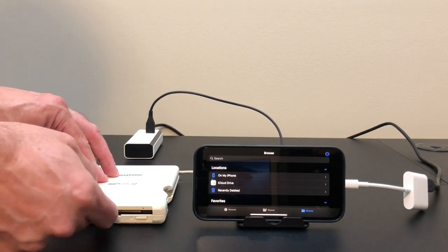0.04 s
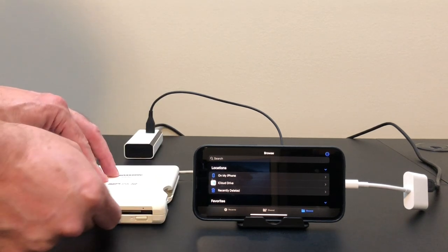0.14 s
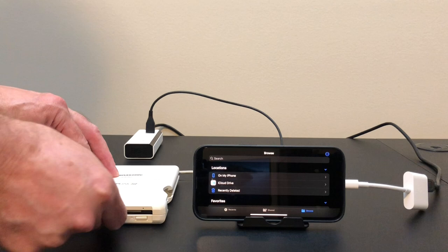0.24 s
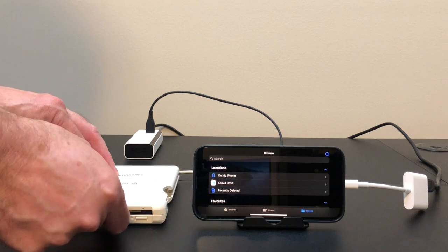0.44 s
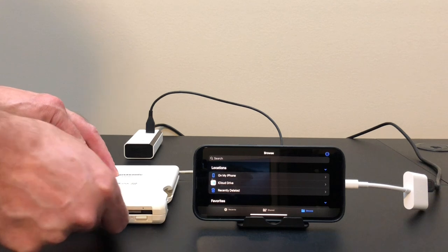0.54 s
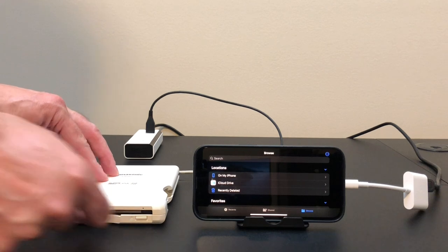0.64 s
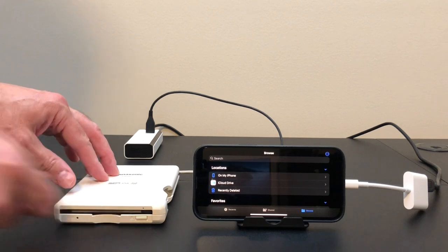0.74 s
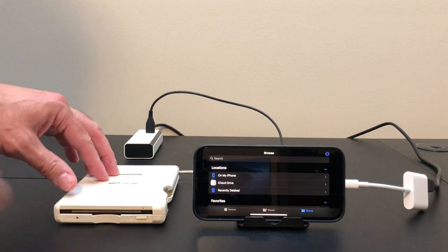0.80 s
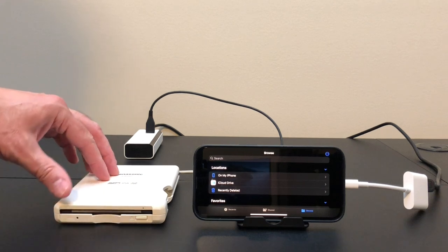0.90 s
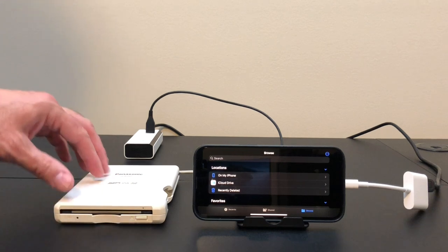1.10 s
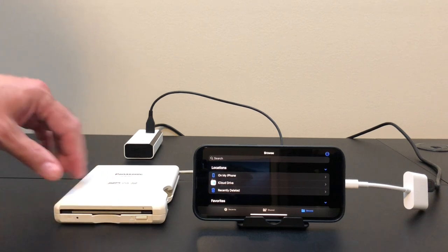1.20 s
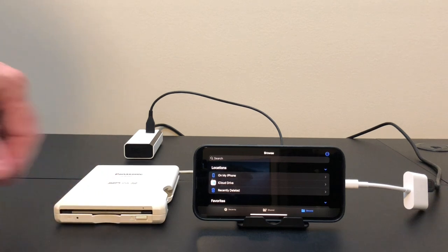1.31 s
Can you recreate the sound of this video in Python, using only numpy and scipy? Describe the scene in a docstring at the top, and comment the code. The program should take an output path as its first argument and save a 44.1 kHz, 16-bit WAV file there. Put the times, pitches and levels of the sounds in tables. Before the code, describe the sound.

A floppy disk clunks into its drive, followed by faint clicks and a short motor whir.

```python
"""A plastic clunk and a thump in the desk: a floppy disk is pushed home and the drive's carriage drops.
The disk rubs faintly in its sleeve while the mechanism ticks, plastic and metal in short contacts.
Then the head stepper whirs, its even steps stacking up harmonics; it clacks and runs on with a
sharper tone. All of it is close by, in a quiet room with a low hum."""
import sys
import numpy as np
from scipy import signal
from scipy.fft import rfft, irfft, next_fast_len
from scipy.io import wavfile
from scipy.ndimage import map_coordinates

SR = 44100
rng = np.random.default_rng(int(sys.argv[2]) if len(sys.argv) > 2 else 0)


def log_audio(samples):
    """Write samples as a 16-bit WAV file to the path given in sys.argv[1]."""
    # one column per channel
    frames = np.atleast_2d(samples).T
    # limit to full scale, then quantise
    limited = np.clip(frames, -1, 1)
    pcm = np.round(limited * 32767).astype(np.int16)
    wavfile.write(sys.argv[1], SR, pcm)


N = 59535
T = np.arange(N) / SR

# colour of the still room air: frequency_hz, level_db
AIR_COLOUR = [(20, -45), (35, -27.5), (55, -7), (75, -14), (100, -27.5), (160, -8.5), (220, -14.5),
              (320, -35), (500, -23.5), (800, -21), (1250, -32), (3000, -43), (8000, -46.5), (16000, -55)]
# how long the room rings: frequency_hz, t60_s
ROOM_DECAY = [(150, .28), (400, 0.51), (700, 0.33), (2000, 0.31), (6000, 0.34), (10000, 0.24),
              (16000, 0.22)]
# fader for the disk rubbing in its sleeve: time_s, level_db
RUB_FADER = [(.3, -80), (.4, -60.5), (.58, -65), (.66, -71.5), (.85, -78)]
# colour of that rustle: frequency_hz, level_db
RUB_COLOUR = [(30, -14), (70, 12), (120, -6.5), (300, -6), (520, -4), (680, -3.5), (850, 2), (980, -3),
              (1150, -20.5), (3000, -21.5), (7000, -22.5), (14000, -38)]
# thin sagging tone in the rustle: time_s, pitch_hz, level_db
RUB_GLIDE = [(0.341, 869.2, -66), (.42, 855, -65.5), (.52, 861, -65), (.61, 826, -66), (0.671, 817, -87)]
# mechanism ticks and head clack: start_s, level_db, metal_share_db, t60_s, pitch_hz, ring_share_db
TICK_HITS = [(.461, -62.5, -29, 0.043, 1224, 1), (.5225, -53.5, 8, 0.018, 4560, 2.5),
             (.6005, -49, -4.5, 0.024, 1440, -22), (.692, -56.5, -29, 0.012, 2080, 4.5),
             (.7065, -47.5, 0.5, 0.015, 7170, -5), (.7115, -46.5, -3.5, 0.012, 760, -4),
             (.755, -62.5, -24, 0.048, 2250, -21), (.8668, -49.5, -9.5, 0.031, 2430, -5.5),
             (.8892, -47, 0, 0.018, 6900, -7), (1.0265, -55, 3, 0.019, 2620, 2)]
CLACK_HITS = [(1.1625, -41.5, -15, 0.039, 1556, -0.5), (1.1692, -31, 4.5, 0.018, 5450, -17),
              (1.1725, -37, -21, 0.061, 2690, -10.5), (1.178, -39, -33, 0.045, 760, -4),
              (1.197, -48.5, -9, 0.052, 5180, 1)]
# colours of their plastic and metal parts: frequency_hz, level_db
TICK_PLASTIC_COLOUR = [(200, -10.5), (700, -2.5), (1400, -6), (2300, 2.5), (3200, -7.5), (4200, -16.5),
                       (8500, -15), (16000, -40)]
TICK_METAL_COLOUR = [(500, -5), (3000, -7), (4650, -3), (5800, -4), (6700, 2), (7600, -2), (8800, -14),
                     (11500, -12.5), (16000, -26)]
CLACK_PLASTIC_COLOUR = [(150, -3), (400, -2), (750, -3.5), (1100, -4.5), (1600, -1.5), (2100, -2),
                        (2800, -1.5), (3700, -1.5), (4400, -10.5), (16000, -63)]
CLACK_METAL_COLOUR = [(1000, -44), (4400, -17), (5400, 6), (6200, -5.5), (7300, -2.5), (9500, -18),
                      (11400, -14), (13000, -24), (16000, -27)]
# runs of the head stepper: start_s, end_s, step_rate_hz, tone_db, buzz_db
STEPPER_RUNS = [(0.892, 1.158, 200.7, -61, -65), (1.151, 1.4, 199.9, -54.5, -66)]
# balance of step harmonics 3 to 20, one row a run, one column a harmonic: level_db
HARMONIC_LEVELS = [
    [-10.5, -26, -12.5, 0, -17.5, -9.5, -10.5, -11, -16, -11, -1, -12.5, -10, -12, -10, -8, -13, -18],
    [-16.5, -14, -19, 0, -17.5, -19.5, -18, -16.5, -34, -8, -13.5, -21, -16.5, -13, -16.5, -7, -23, -19],
]
# fader for the whining harmonic as the head travels: time_s, gain_db
WHINE_FADER = [(.9, -5.5), (.99, 0.5), (1.03, -1), (1.06, -2), (1.15, 0), (1.25, -2)]
# colours of the stepper's treble buzz and its rattle: frequency_hz, level_db
BUZZ_COLOUR = [(3000, -29), (4000, 5), (4600, -3.5), (5300, 2.5), (6500, 0), (7200, -11), (8000, -1.5),
               (9000, -8), (12000, -18)]
RATTLE_COLOUR = [(200, 17.5), (400, -11), (700, 12.5), (1100, -6), (2400, 3.5), (3500, -5), (4500, -6),
                 (6000, -5), (8000, -3.5), (10000, -21), (16000, -24)]
# modes of the drive on the desk: pitch_hz, level_db, t60_s
DESK_MODES = [(50, -26, 0.78), (106.2, -14.5, 0.48), (138.7, 4.5, 0.15), (153.65, -8.5, 0.44),
              (214.2, 2, .21)]
# jolts that thump the desk: start_s, level_db, rise_s
DESK_THUMPS = [(0.2426, -20, 0.0042), (1.186, -42.5, 0.0023)]
# gentle rocking that swells the desk's main resonance: peak_s, level_db, half_length_s
DESK_SWAYS = [(0.389, -41, 0.011), (0.504, -43.5, 0.025), (0.611, -61, 0.032), (0.947, -46, 0.017),
              (1.005, -48.5, 0.023), (1.046, -45, 0.0057), (1.15, -50.5, .018), (1.199, -39, 0.023)]
# blows of the dropping carriage: start_s, level_db
CARRIAGE_HITS = [(0.2361, -25), (0.2385, -19.5), (0.2436, -27.5), (0.2558, -43), (.268, -34.5)]
# colour of each blow: frequency_hz, level_db
CARRIAGE_COLOUR = [(80, -42), (180, -38), (280, -6.5), (350, 1.5), (470, -6), (720, -1.5), (860, -9.5),
                   (1250, -8), (1550, -6), (2000, -5), (2400, -5.5), (3200, -11), (4500, -18),
                   (5600, -16.5), (6600, -17.5), (8000, -16.5), (9500, -22.5), (11000, -22.5),
                   (16000, -40.5)]
# modes of the plastic case: pitch_hz, level_db, t60_s
CASE_MODES = [(484.8, -4.5, .25), (564, -3.5, 0.16), (664, -6, 0.29), (711, -8.5, 0.28), (750, -1.5, 0.17),
              (777, -7.5, 0.23), (934, -3, .14), (1143, -7.5, 0.21), (1271, 0.5, 0.061), (1810, -4, 0.067),
              (1972, -5, 0.16), (1989, 9, 0.034), (2140, -11.5, 0.19), (6070, -13.5, 0.14)]


def amp(db):
    """Decibels to gain."""
    return 10 ** (np.asarray(db) / 20)


def unit(x):
    """Scale to rms 1."""
    return x / np.sqrt(np.mean(x ** 2) + 1e-20)


def along(points, hz):
    """Read a curve of (frequency_hz, value) points on a log frequency axis."""
    frequencies, values = np.transpose(points)
    return np.interp(np.log(hz + 1), np.log(frequencies + 1), values)


def noise(colour):
    """Coloured noise of rms 1."""
    eq = amp(along(colour, np.fft.rfftfreq(N, 1 / SR)))
    return unit(irfft(rfft(rng.standard_normal(N)) * eq, N))


def wobble(rate_hz):
    """A smooth random drift with rate_hz knots a second."""
    coarse = np.linspace(0, T[-1], 400)
    drift = map_coordinates(rng.standard_normal(64), [coarse * rate_hz], mode='mirror')
    return np.interp(T, coarse, drift)


def strike(start_s, rise_s, t60_s):
    """Envelope of a hit: quick attack, exponential decay."""
    age = np.maximum(T - start_s, 0)
    return (1 - np.exp(-age / rise_s)) * np.exp(-np.log(1000) * age / t60_s)


def ring(modes, start_s, rise_s):
    """A struck body rings as a sum of damped sines."""
    return sum(amp(db) * strike(start_s, rise_s, t60_s) * np.sin(2 * np.pi * hz * (start_s - T))
               for hz, db, t60_s in modes)


def room_tone(air_db=-70, hum_hz=119, hum_db=-66):
    """The bed: still air and mains hum."""
    hum = np.sqrt(2) * np.sin(2 * np.pi * hum_hz * T)
    return amp(air_db) * noise(AIR_COLOUR) + amp(hum_db) * hum


def room_reverb(x, wet_db):
    """The sound plus the room's tail, each frequency dying at its own speed."""
    hz, t, spectrum = signal.stft(rng.standard_normal(SR // 2), SR, nperseg=256)
    decay = np.exp(-np.log(1000) * t / along(ROOM_DECAY, hz)[:, None])
    tail = signal.istft(spectrum * decay, SR, nperseg=256)[1]
    tail *= 1 - np.exp(-np.arange(len(tail)) / SR / 0.0023)  # soften the attack
    return x + amp(wet_db) * signal.fftconvolve(x, tail / np.linalg.norm(tail))[:N]


def sleeve_rub():
    """The disk rubs in its sleeve as it settles: a faint rustle with a thin, sagging tone."""
    times, hz, db = np.transpose(RUB_GLIDE)
    phase = 2 * np.pi * np.cumsum(np.interp(T, times, hz)) / SR + 0.5 * wobble(rate_hz=30)
    tone = amp(np.interp(T, times, db, left=-120, right=-120)) * np.sin(phase)
    fader = amp(np.interp(T, *np.transpose(RUB_FADER), left=-120))
    return fader * noise(RUB_COLOUR) + tone


def mechanism_clicks(hits, plastic, metal, wet_db):
    """Short contacts, each in three layers: plastic body, brighter metal and one ringing pitch."""
    out = np.zeros(N)
    for start_s, db, metal_db, t60_s, hz, ring_db in hits:
        ping = np.sqrt(2) * np.sin(2 * np.pi * hz * (T - start_s))
        contact = noise(plastic) + amp(metal_db) * noise(metal) + amp(ring_db) * ping
        envelope = amp(db) * strike(start_s, rise_s=0.00024, t60_s=t60_s)
        out += room_reverb(envelope * contact, wet_db)
    return out


def step_harmonic(step_phase, k, waver_db=2.5, waver_hz=6.73):
    """Harmonic k of the step rate, its level wavering at random."""
    waver = amp(waver_db * wobble(waver_hz))
    return np.sqrt(2) * waver * np.sin(k * step_phase + rng.uniform(0, 2 * np.pi))


def head_stepper(fade_s=0.02, jitter_rad=0.016, whine_harmonic=13, rattle_db=-62, pulse_depth=0.72):
    """Even steps give clean harmonics, a fine treble buzz and a rattle that pulses with each step."""
    out = np.zeros(N)
    whine = amp(np.interp(T, *np.transpose(WHINE_FADER)))
    for (start_s, end_s, step_hz, tone_db, buzz_db), levels in zip(STEPPER_RUNS, HARMONIC_LEVELS):
        gate = np.clip((T - start_s) / fade_s, 0, 1) * np.clip((end_s - T) / fade_s + 1, 0, 1)
        jitter = jitter_rad * noise([(1, -2), (30, 2), (200, -15), (600, -57)])
        phase = 2 * np.pi * step_hz * T + jitter
        tone = sum(amp(db) * step_harmonic(phase, k) * (whine if k == whine_harmonic else 1)
                   for k, db in enumerate(levels, 3))
        buzz = np.zeros(N)
        for k in range(21, 62):
            harmonic_db = along(BUZZ_COLOUR, k * step_hz) + rng.normal(0, 2.5)
            buzz += amp(harmonic_db) * step_harmonic(phase, k)
        rattle = noise(RATTLE_COLOUR) * unit(np.exp(pulse_depth * np.cos(phase)))
        out += gate * (amp(tone_db) * tone + amp(buzz_db) * unit(buzz) + amp(rattle_db) * rattle)
    return out


def desk_thump(resonance_hz=155):
    """The low end: hard jolts boom in the desk; gentle rocking swells its main resonance."""
    boom = sum(amp(db) * ring(DESK_MODES, start_s, rise_s) for start_s, db, rise_s in DESK_THUMPS)
    swell = sum(amp(db) * np.exp(-((T - peak_s) / half_s) ** 2) for peak_s, db, half_s in DESK_SWAYS)
    return boom + swell * np.sin(2 * np.pi * resonance_hz * T)


def carriage_clunk(ring_share_db=-12):
    """The carriage snaps down in a burst of contacts; the hardest rings the case."""
    crack = np.zeros(N)
    for start_s, db in CARRIAGE_HITS:
        envelope = amp(db) * strike(start_s, rise_s=0.00029, t60_s=0.024)
        crack += room_reverb(envelope * noise(CARRIAGE_COLOUR), wet_db=-6)
    hardest_s, hardest_db = CARRIAGE_HITS[1]
    return crack + amp(hardest_db + ring_share_db) * ring(CASE_MODES, hardest_s, rise_s=0.0004)


def scene():
    """The mono mix: drive and desk over the room tone."""
    ticks = mechanism_clicks(TICK_HITS, TICK_PLASTIC_COLOUR, TICK_METAL_COLOUR, wet_db=-7.5)
    clack = mechanism_clicks(CLACK_HITS, CLACK_PLASTIC_COLOUR, CLACK_METAL_COLOUR, wet_db=-6.5)
    return (carriage_clunk() + desk_thump() + ticks + clack + head_stepper() + sleeve_rub() + room_tone())[None]


def record(dry):
    """Master EQ: a bass cut, a scoop in the low mids and a hard ceiling on the treble."""
    low_cut_hz, high_cut_hz = 46, 16000
    scoop_hz, scoop_width_hz, scoop_db = 361, 110, -8.5
    padded = next_fast_len(N + SR // 2)
    hz = np.fft.rfftfreq(padded, 1 / SR)
    band = 1j * hz * scoop_width_hz / (scoop_hz ** 2 - hz ** 2 + 1j * hz * scoop_width_hz)
    scoop = 1 - (1 - amp(scoop_db)) * band
    trimmed = signal.sosfilt(signal.butter(2, low_cut_hz, 'highpass', fs=SR, output='sos'), dry)
    return irfft(rfft(trimmed, padded) * scoop * (hz < high_cut_hz), padded)[..., :N]


dry = scene()
out = record(dry)
log_audio(out)
```